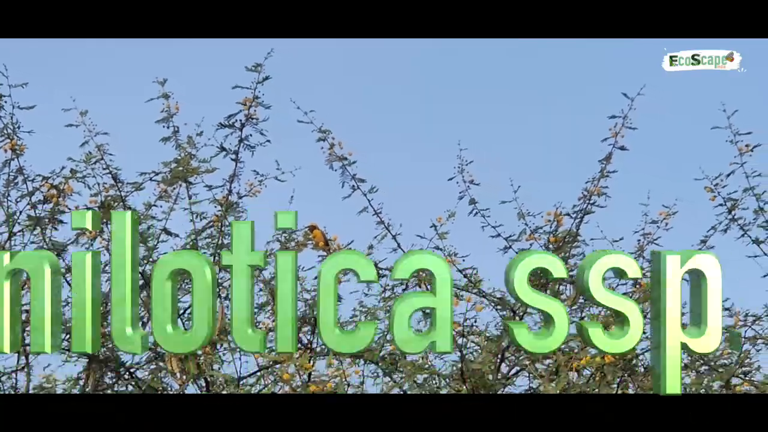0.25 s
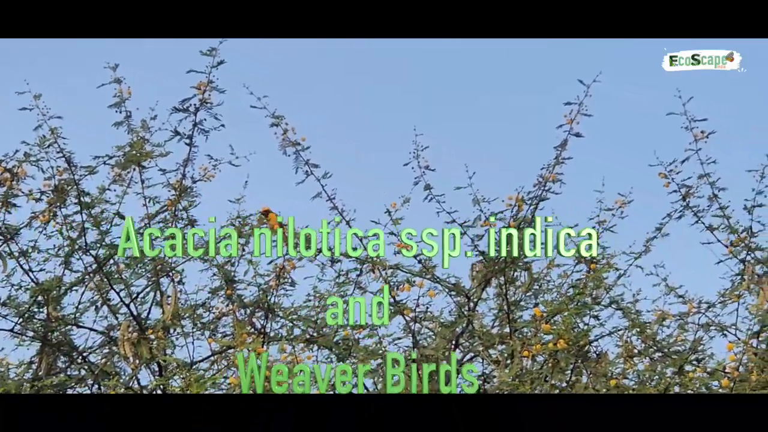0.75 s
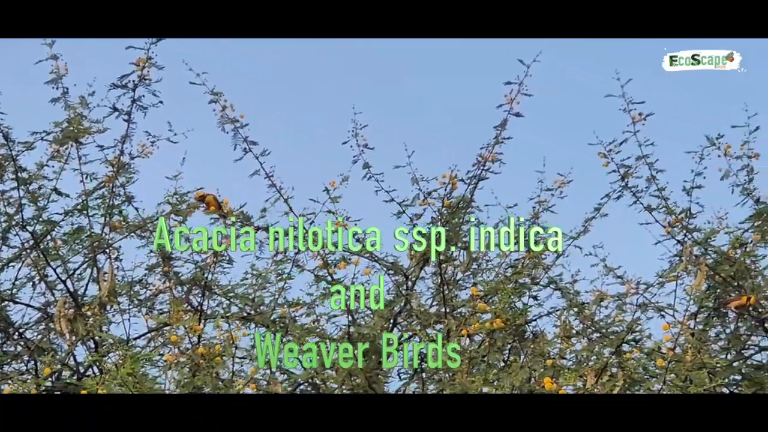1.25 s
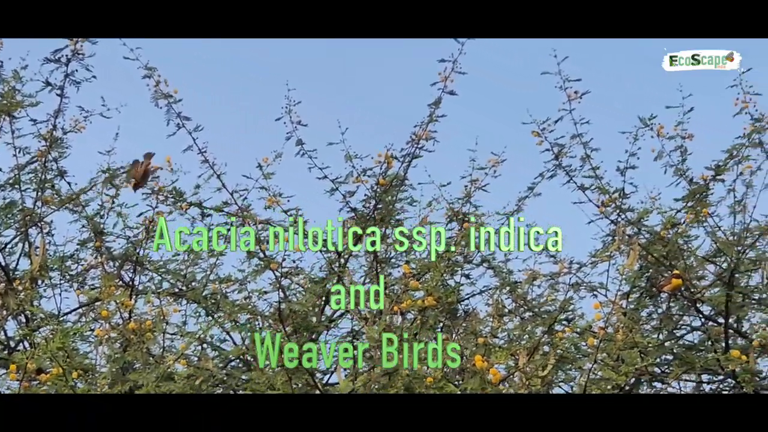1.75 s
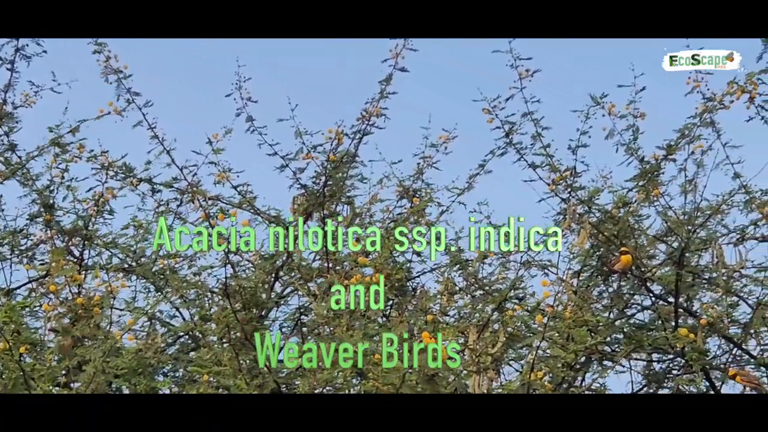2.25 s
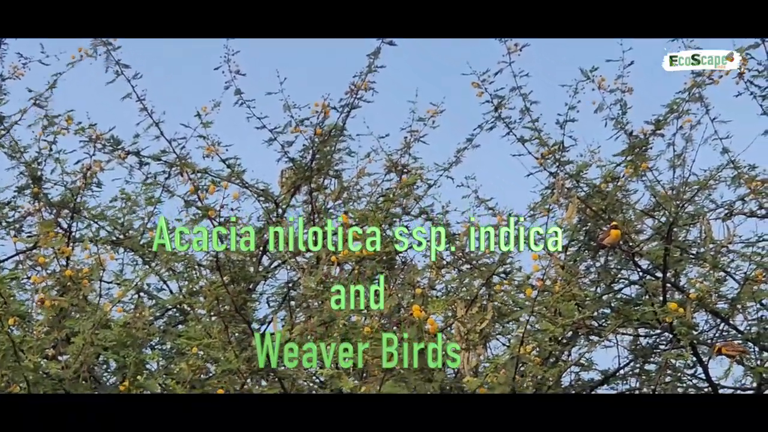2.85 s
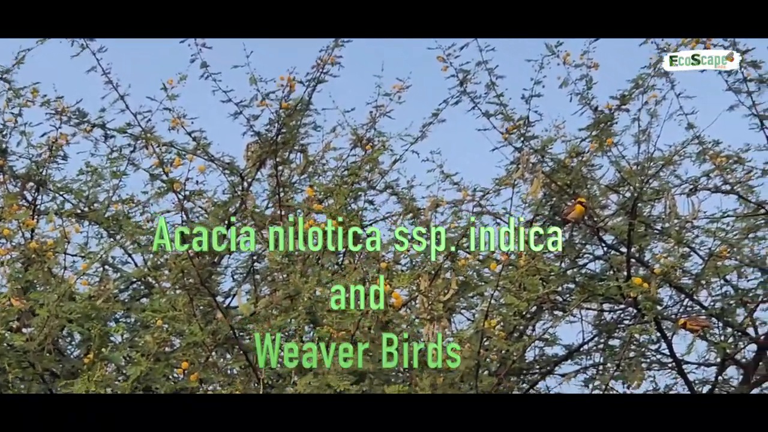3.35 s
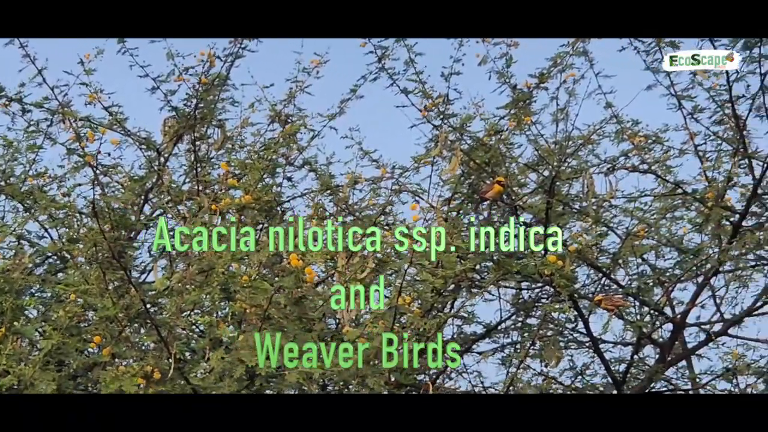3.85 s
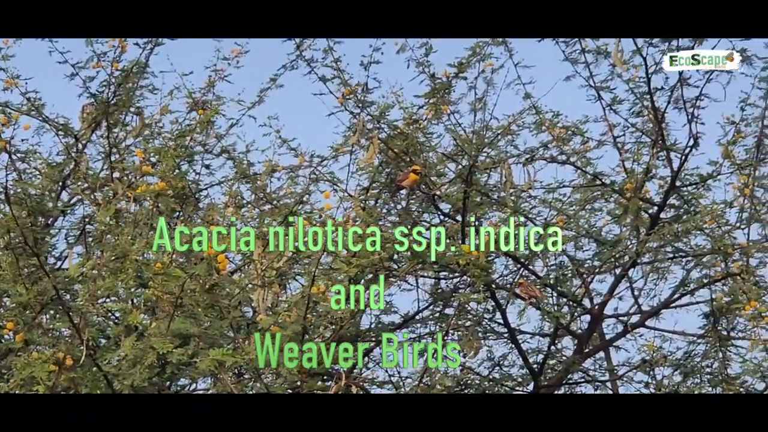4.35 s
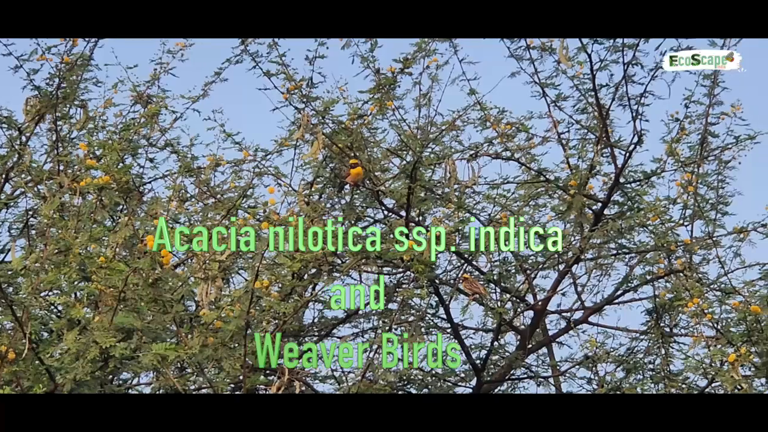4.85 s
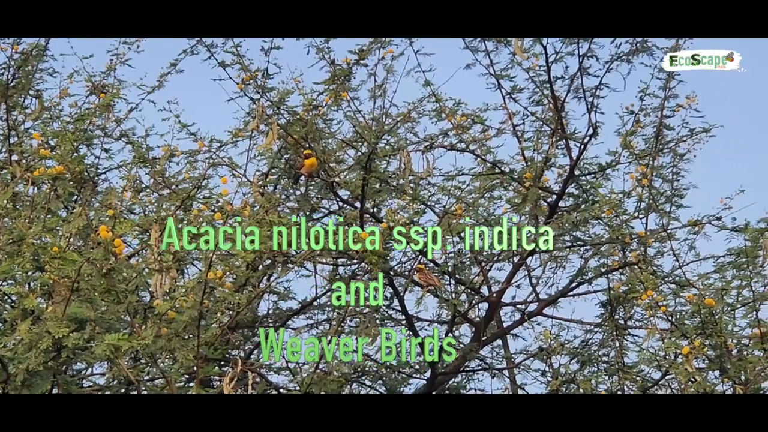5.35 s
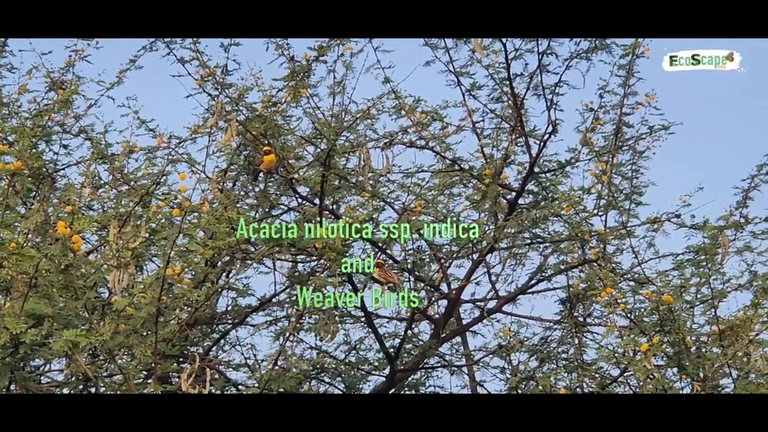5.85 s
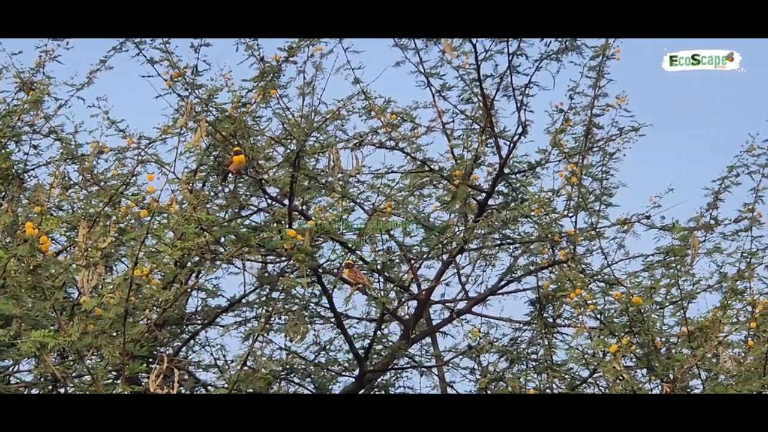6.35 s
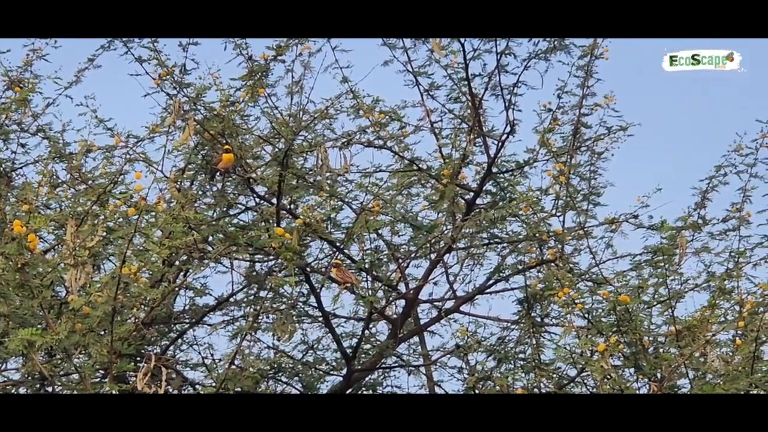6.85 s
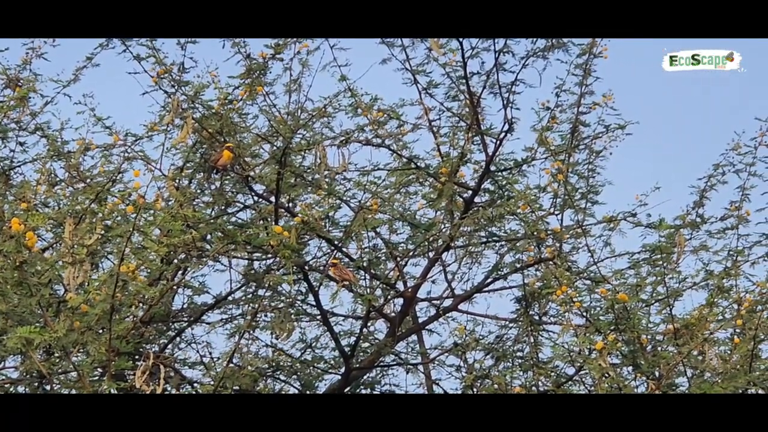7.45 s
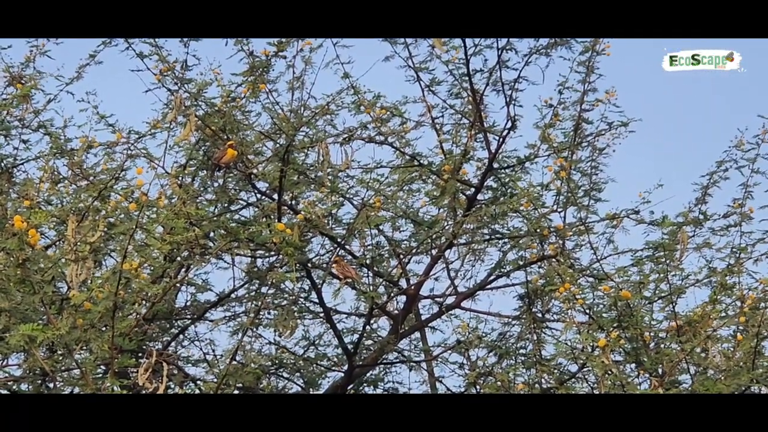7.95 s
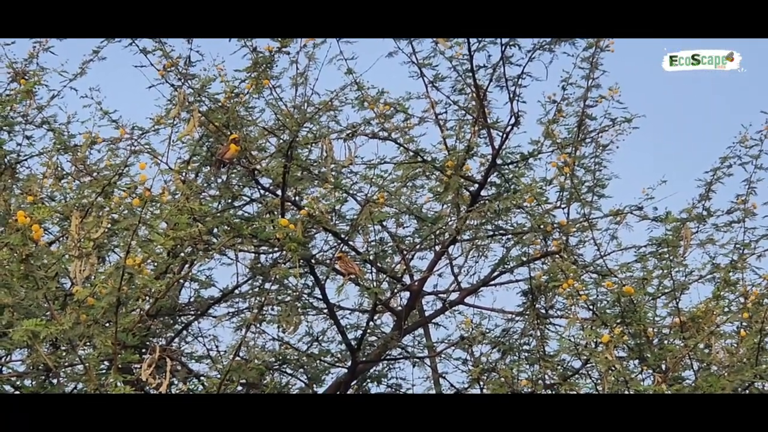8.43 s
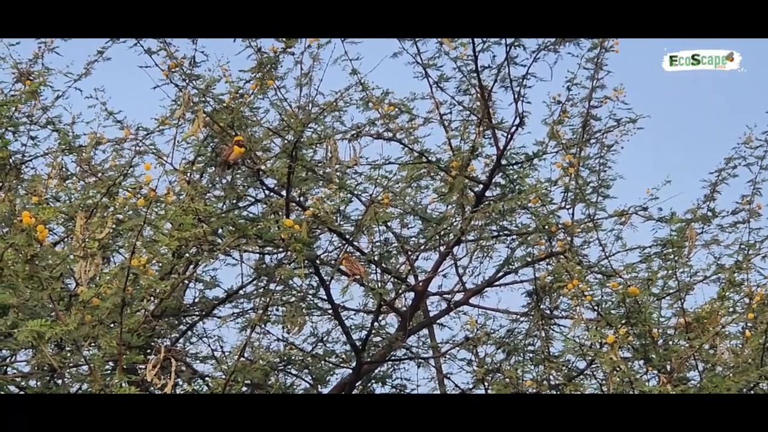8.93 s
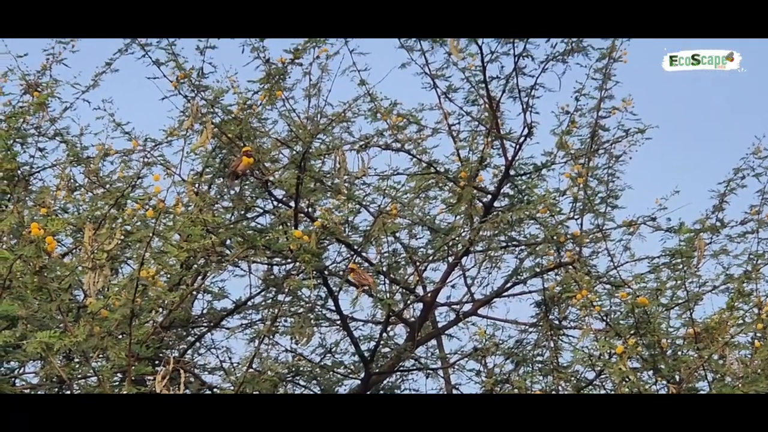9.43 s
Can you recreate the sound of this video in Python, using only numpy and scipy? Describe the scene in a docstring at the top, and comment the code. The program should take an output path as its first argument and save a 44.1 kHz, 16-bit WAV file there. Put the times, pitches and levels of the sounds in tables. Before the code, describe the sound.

Outdoors by a thorny tree, a small bird gives a half-second wheezy buzz, then sharp chips quicken into dense chatter with bright warbles. After three seconds it thins to soft whistles, a nasal whine and faint chips. Later come stuttering rattles, tumbling runs, a piercing fluttering whistle, a screech and a long wheeze. Low wind rumble, distant engine and thin insect hiss lie behind; stereo microphone with wind buffets, mostly left.

```python
"""A long wheezy buzz over a breeze's rumble comes first; then whistles, chips, warbles and stutters of weaver birds.
Near the end, tumbling runs, a long whistle and a screech lead into a second, longer wheeze in the thorn tree.
Bird voices are gliding tones with weak overtones, plus shaped noise where they are hoarse; the tree adds echoes.
Insects (sweeps and filtered noise), an engine (noisy thumps) and air and wind (noise) lie behind, in stereo.
Levels in the tables are relative: later gains shift many of them."""
import sys
import numpy as np
from scipy import signal
from scipy.fft import rfft, irfft
from scipy.io import wavfile
from scipy.ndimage import uniform_filter1d

SR = 44100
rng = np.random.default_rng(int(sys.argv[2]) if len(sys.argv) > 2 else 0)


def wav_record(signal):
    """Record a signal, one row per channel, as 16-bit PCM in the file named by sys.argv[1]."""
    frames = np.transpose(np.atleast_2d(signal))
    bounded = np.clip(frames, -1, 1)
    # unit amplitude maps onto the largest positive 16-bit level
    quanta = np.round(bounded * 32767).astype(np.int16)
    wavfile.write(sys.argv[1], SR, quanta)


N = 427329  # samples
TIME = np.arange(N) / SR


def gain_of(db):
    """Turns decibels into amplitude."""
    return 10 ** (np.asarray(db) / 20)


def evened(x):
    """Scales a sound to rms 1."""
    return x / np.sqrt(np.mean(x ** 2) + 1e-20)


def pan(db):
    """Left and right gains; a positive value makes the left louder."""
    return gain_of([[db / 2], [-db / 2]])


def noise(n=N):
    """Two independent channels of white noise."""
    return rng.standard_normal((2, n))


def read(points, hz):
    """Reads a spectrum, joining its points on a log-frequency axis."""
    f, value = np.transpose(points)
    return np.interp(np.log(hz + 1), np.log(f + 1), value)


def follow(rows, t):
    """Reads every column of a curve at the times t."""
    s, *columns = np.transpose(rows)
    return [np.interp(t, s, column) for column in columns]


def coloured(x, points):
    """Filters by a spectrum and scales to rms 1."""
    n = x.shape[-1]
    gains = gain_of(read(points, np.fft.rfftfreq(n, 1 / SR)))
    return evened(irfft(rfft(x) * gains, n))


def band(x, hz, width_hz):
    """Keeps a bell-shaped band of frequencies, like a resonance, at rms 1."""
    n = x.shape[-1]
    bell = np.exp(-.5 * ((np.fft.rfftfreq(n, 1 / SR) - hz) / width_hz) ** 2)
    return evened(irfft(rfft(x) * bell, n))


def drift(n, hz):
    """A random curve: straight lines between about hz random values a second."""
    knots = np.arange(int(n * 4000 / SR) + 2)
    return np.interp(np.arange(n) * min(hz, 3999) / SR, knots, rng.standard_normal(len(knots)))


def angle(hz):
    """The running phase of a frequency curve, in radians."""
    return 2 * np.pi * np.cumsum(hz) / SR


def add(mix, s, sound):
    """Mixes a sound in at time s."""
    part = mix[:, max(round(s * SR), 0):][:, :sound.shape[-1]]
    part += sound[..., :part.shape[1]]


def syrinx(hz, level, pan_db, lead, second_db=-30, third_db=-33):
    """A bird's voice organ: a nearly pure tone with weak overtones, lead radians early on the left."""
    phase = angle(hz) + np.array([[lead], [0]])
    second = gain_of(second_db) * np.sin(2 * phase)
    third = gain_of(third_db) * np.sin(3 * phase) * (3 * hz < SR / 2)
    return np.sqrt(2) * (np.sin(phase) + second + third) * level * pan(pan_db)


def note(length, pitches_hz, db, pan_db, depth_hz=0, trill_hz=68):
    """A whistled note that slurs through evenly spaced pitches, trilled if it has a depth."""
    u = np.linspace(0, 1, int(length * SR))
    trill = np.sin(angle(trill_hz * (1 + 0.18 * drift(len(u), 112))))
    count = len(pitches_hz)
    slur = np.polyfit(np.linspace(0, 1, count), np.log(pitches_hz), count - 1)
    hz = np.exp(np.polyval(slur, u))
    hz = hz * (1 + 0.0087 * drift(len(u), 298)) + depth_hz * trill
    level = evened(signal.windows.tukey(len(u), .3) * gain_of(-trill * depth_hz / 50))
    return syrinx(hz, gain_of(db) * level, pan_db, 1.25, second_db=-43, third_db=-52)


def stroke(top_hz, length, db, fall=.72):
    """One quick downward sweep; fall is the last pitch over the first."""
    u = np.linspace(0, 1, int(length * SR))
    level = gain_of(db - 4.0) * abs(np.sin(np.pi * u)) ** .7
    return syrinx(top_hz * fall ** u, level, 2.7, 1.81, second_db=-22, third_db=-36)


# Colour of open air: (frequency [Hz], level [dB])
AIR_COLOUR = [(150, -39), (250, 1), (452, -6), (583, -3.5), (865, -9), (1420, -5), (1950, -9),
              (2400, -11.5), (3560, -15), (4000, -11), (5200, -16.5), (8800, -120)]
# Loudness of the air over time: (time [s], level [dB])
AIR_LEVEL = [(0.0, -59), (0.13, -61.5), (1.32, -67), (6.26, -68), (9.61, -66), (9.69, -71)]


def air():
    """The soft wash of open country, a faint far drone and a thin hiss: all filtered noise."""
    db, = follow(AIR_LEVEL, TIME)
    # the shared part and its spread have opposite polarity on left and right
    wash = coloured(noise() + 0.82 * rng.standard_normal(N), AIR_COLOUR) * gain_of([[1], [-1]])
    drone = gain_of(-84.0) * band(noise(), 570, 25)
    hiss = gain_of(-81) * band(noise(), 17000, 5500)
    return gain_of(db + 10.0) * wash + drone + hiss


# Colour of wind rumble: (frequency [Hz], level [dB])
WIND_COLOUR = [(11, -44), (18, -25), (43, 3.5), (65, 2.5), (139, -7.5), (197, -18), (233, -25),
               (500, -41.5), (650, -77), (1100, -120)]
# The breeze between gusts: (time [s], level [dB], upper rumble against the deep part [dB])
BREEZE = [(0, -32.5, -21), (.3, -40, -23), (2.3, -43.5, -11), (3.9, -43.5, -19), (4.8, -43.5, -38),
          (5.8, -43.5, -6.5), (6.45, -41.5, -29), (6.8, -39.5, -9.5), (7.6, -40, -11), (8.05, -41, -33),
          (8.4, -38.5, -18), (8.85, -45.5, -20), (9.69, -40, -9.5)]
# Gusts: (peak time [s], half width [s], level [dB], upper rumble against the deep part [dB], left-right [dB])
GUSTS = [(4.215, 0.034, -31.5, -34, 6), (4.94, 0.026, -33.5, -35, 3), (7.02, 0.048, -40, -1.5, 25),
         (7.32, 0.084, -29.5, -8.5, 24), (8.717, 0.036, -29.5, -7.5, 16), (9.1, 0.078, -34, -6, 22),
         (9.37, 0.12, -32.5, -9.5, 30), (9.57, 0.035, -30.5, -11, 12)]


def wind(side_db=0.5, swell_db=4):
    """A lumpy breeze rumbles on both microphones; gusts swell over it, louder on the left, and reach higher up."""
    rumble = coloured(noise() + 1.35 * rng.standard_normal(N), WIND_COLOUR)
    deep = signal.sosfiltfilt(signal.butter(4, 130, fs=SR, output="sos"), rumble)
    # level out the deep part's own swells, so the curves alone set them
    deep_even = deep / np.sqrt(uniform_filter1d((deep ** 2).mean(0), 7000) + 1e-9)
    breeze_db, breeze_upper_db = follow(BREEZE, TIME)
    flows = [(gain_of(breeze_db + swell_db * drift(N, 8)), breeze_upper_db, side_db)]
    for s, width, db, upper_db, gust_side_db in GUSTS:
        swell = np.exp(-.5 * ((TIME - s) / width) ** 2)
        flows.append((gain_of(db) * swell, upper_db, gust_side_db))
    deep_power = upper_power = 0
    for level, upper_db, flow_side_db in flows:
        power = (level * evened(pan(flow_side_db))) ** 2
        deep_power = deep_power + power
        upper_power = upper_power + power * gain_of(2 * upper_db)
    return np.sqrt(deep_power) * deep_even + np.sqrt(upper_power) * evened(rumble - deep)


# The far engine: (time [s], firings per second [Hz], level [dB])
ENGINE = [(0, 27.7, -48), (1.7, 23.1, -51.5), (2.2, 26, -43.5), (2.7, 24.8, -44), (3.3, 26.5, -48.5),
          (3.7, 28.3, -55.5), (9.7, 32.4, -54)]


def engine():
    """Each firing thumps a short exhaust pipe: a noisy burst that dies away within the cycle."""
    rate, db = follow(ENGINE, TIME)
    cycle = angle(rate) / (2 * np.pi) % 1
    thumps = np.exp(-cycle / 0.044) * (1 + 3 * rng.standard_normal(N))
    pipe = [(30, -35), (80, -10.0), (130, -1.0), (200, -3),
            (280, -29.0), (600, -36.0), (1500, -51), (4000, -100)]  # (Hz, dB)
    return gain_of(db) * coloured(thumps, pipe) * pan(5)


# Colour of the shrillest insect: (frequency [Hz], level [dB])
INSECT_COLOUR = [(5900, -26), (6300, -1.5), (7000, -4.5), (7600, 2), (8500, 2), (9100, -3), (9500, -92)]


def insects(hiss=3.2):
    """One insect rattles in fast falling sweeps under hiss; lower down, one throbs and another flickers."""
    cycle = angle(118 * (1 + .11 * drift(N, 120))) / (2 * np.pi) % 1
    sweep_hz = 9200 - 2900 * cycle + 160 * drift(N, 400)
    sweep_level = np.sin(np.pi * cycle) * gain_of(2.0 * drift(N, 150))
    sweeps = syrinx(sweep_hz, sweep_level, 0.33, 1.52, second_db=-85, third_db=-60)
    shrill = gain_of(-52.5) * coloured(evened(sweeps) + hiss * noise(), INSECT_COLOUR)
    throb = gain_of(3.5 * np.sin(angle(27 + 2 * drift(N, 8))) + 2.5 * drift(N, 5))
    low = gain_of(-55.5) * evened(throb * band(noise(), 4698, 175))
    flicker = gain_of(1.8 * drift(N, 70))
    high = gain_of(-56.5) * evened(flicker * band(noise(), 5254, 235))
    return shrill + low + high


def colony(count=170):
    """Many more birds farther off, each giving a short falling note."""
    out = np.zeros((2, N))
    for when, pitch, long, loud, side in rng.random((count, 5)):
        u = np.linspace(0, 1, int((0.0255 + 0.0497 * long) * SR))
        level = gain_of(-76 + 6 * (loud - .5)) * np.sin(np.pi * u)
        hz = (1900 + 1600 * pitch) * (1 - 0.076 * u ** 2)
        call = syrinx(hz, level, 8 * (side - .5), 2 * np.pi * side, second_db=-48, third_db=-53)
        add(out, when * N / SR, call)
    return out


# Hoarse calls from far away: (time [s], length [s], centre [Hz], level [dB])
FAR_CALLS = [(3.714, 0.25, 1930, -70.5), (6.209, 0.55, 1380, -84), (8.321, .3, 1510, -66),
             (8.868, .32, 1480, -67), (9.392, 0.31, 1480, -68)]


def far_calls():
    """Distant hoarse birds: rough, slowing pulses of noise in one throat resonance."""
    out = np.zeros((2, N))
    for s, length, hz, db in FAR_CALLS:
        n = int(length * SR)
        pulses = gain_of(0.88 * np.sin(angle(np.linspace(115, 95, n)))) * noise(n)
        add(out, s, gain_of(db) * band(pulses, hz, 215) * signal.windows.tukey(n, .6))
    return out


# A far bird's nasal whine: (time [s], pitch [Hz], level [dB], stammer depth [dB])
WHINE = [(3.17, 296, -66, 14), (3.205, 297, -49, 14), (3.29, 306, -44, 12), (3.4, 301, -49, 7),
         (3.5, 296, -50, 5), (3.6, 290, -60, 1), (3.72, 276, -65, 2)]
# Its throat: (frequency [Hz], level [dB])
WHINE_THROAT = [(1500, -16), (1850, 0), (2650, -8), (2980, 5), (3270, -17), (3580, 12), (3850, -6),
                (4150, -22), (4800, -35)]


def whine(stammer_hz=28.5, dip=.035):
    """A buzzing stack of overtones through a narrow throat; the pitch dips in each pulse of the stammer."""
    t = np.arange(WHINE[0][0], WHINE[-1][0], 1 / SR)
    hz, db, stammer = follow(WHINE, t)
    pulse = np.cos(angle(stammer_hz + drift(len(t), 24)))
    shake = .0015 * (1 + abs(stammer)) * drift(len(t), 401)
    bend = dip * np.clip(stammer / 4, 0, 1) * (.6 - pulse)
    phase = angle(hz * (1 + shake + bend))
    overtones = sum(np.cos(k * phase + np.array([[k / 10], [0]])) for k in range(5, 16))
    out = np.zeros((2, N))
    add(out, t[0], coloured(overtones, WHINE_THROAT) * gain_of(db + stammer * (pulse - 1.5)))
    return out


# Soft coos from far away: (time [s], length [s], pitch [Hz], level [dB])
COOS = [(5.052, 0.11, 572, -54.5), (7.441, 0.11, 615, -51.5), (9.228, 0.197, 609, -60.5)]


def coos(end=0.93):
    """Low, nearly level notes that sink a little at the end."""
    out = np.zeros((2, N))
    for s, length, hz, db in COOS:
        add(out, s, note(length, [hz, hz, end * hz], db, pan_db=7))
    return out


# Short drooping pips: (time [s], pitch [Hz], level [dB])
PIPS = [(.02, 3250, -61), (.128, 3330, -61), (.232, 3200, -52), (1.265, 2240, -52.5), (2.055, 1960, -53),
        (3.34, 2090, -44.5), (4.342, 1990, -50), (4.745, 2174, -47.5), (5.563, 1960, -48.5),
        (8.712, 2247, -35.5), (8.866, 2980, -38.5), (8.95, 2285, -46)]


def pips(length_s=0.04, start=0.93, end=0.902):
    """Short notes that rise slightly and then droop."""
    out = np.zeros((2, N))
    for s, hz, db in PIPS:
        add(out, s, note(length_s, [start * hz, hz, end * hz], db, pan_db=3.5))
    return out


# Arched whistles: (time [s], length [s], top [Hz], last pitch [Hz], level [dB], buzz depth [Hz])
ARCHES = [(3.711, 0.088, 4400, 3500, -48, 260), (4.314, 0.1, 3600, 3300, -50, 60),
          (5.723, .125, 3610, 3000, -47.5, 70)]


def arches(start=.91, shoulder=.95):
    """Buzzing whistles that rise quickly and sink slowly."""
    out = np.zeros((2, N))
    for s, length, hz, last, db, depth_hz in ARCHES:
        pitches_hz = [start * hz, hz, shoulder * hz, last]
        add(out, s, note(length, pitches_hz, db, 1.7, depth_hz, trill_hz=147.6))
    return out


# Low trills: (time [s], length [s], pitch [Hz], level [dB], left-right [dB])
TRILLS = [(0.335, 0.04, 2150, -40.5, 1), (1.616, 0.016, 2200, -44.5, 1), (1.64, 0.051, 2380, -44.5, -3),
          (2.891, .06, 2670, -53.5, -14), (3.007, 0.06, 2380, -42, -2), (4.666, 0.099, 2380, -45.5, -2),
          (6.58, 0.08, 2490, -44.5, -2), (8.415, 0.098, 2330, -44.5, 10), (8.612, 0.084, 2540, -46.5, 12),
          (8.861, 0.034, 2100, -43, 3), (9.034, 0.071, 3183, -39, 0)]


def trills(ends=.92, depth_hz=215, trill_hz=85):
    """Rolling notes that bow gently up and down."""
    out = np.zeros((2, N))
    for s, length, hz, db, pan_db in TRILLS:
        add(out, s, note(length, [ends * hz, hz, ends * hz], db, pan_db, depth_hz, trill_hz))
    return out


# Sliding whistles: (time [s], length [s], first pitch [Hz], last pitch [Hz], level [dB])
SLIDES = [(0.302, 0.048, 3990, 4070, -35), (0.363, 0.04, 4040, 4160, -31.5),
          (0.444, 0.0162, 4430, 3500, -33), (0.453, 0.022, 3520, 3090, -35),
          (0.479, 0.042, 2370, 2006, -45.5), (0.554, 0.013, 3100, 3080, -45.5),
          (0.605, 0.071, 4300, 4270, -51), (0.767, 0.031, 4800, 4560, -58), (1.2, 0.08, 2420, 2970, -63),
          (1.886, 0.072, 3600, 3800, -42), (4.7, 0.028, 3050, 3320, -45), (4.74, 0.027, 3760, 3250, -46),
          (4.764, 0.028, 3180, 3050, -39.5), (5.692, 0.044, 2970, 2880, -53),
          (5.861, .023, 3280, 2570, -52.5), (6.33, 0.16, 1470, 1390, -60.5), (6.43, 0.05, 3800, 3300, -59),
          (6.628, 0.04, 3750, 2950, -48.5), (6.69, 0.026, 4000, 3000, -50), (6.791, .048, 4130, 2810, -53),
          (7.353, 0.085, 1690, 1540, -52), (8.68, 0.011, 3000, 2830, -39), (8.827, 0.13, 4390, 3630, -26.5),
          (8.96, 0.069, 3630, 3200, -34.5), (9.426, 0.052, 5050, 4500, -30)]


def slides():
    """Whistles that glide evenly from one pitch to another."""
    out = np.zeros((2, N))
    for s, length, first, last, db in SLIDES:
        add(out, s, note(length, [first, last], db, pan_db=2.5))
    return out


# A phrase that slides down in two steps: (delay [s], length [s], first pitch [Hz], middle pitch [Hz],
# last pitch [Hz], trill depth [Hz], level [dB], left-right [dB])
STEP_PHRASE = [(0, .076, 3950, 2770, 2600, 0, 1.5, 5), (.085, 0.028, 2680, 2260, 1760, 0, 3.5, 10.5)]
# Its repeats: (time [s], level [dB])
STEP_SONG = [(5.9, -56.5), (6.148, -55.5), (6.385, -55), (6.622, -54.5), (6.859, -54.5)]
# A phrase that trills upwards, peaks, and drops to a low held note: columns as in STEP_PHRASE
TRILL_PHRASE = [(0, 0.11, 2840, 3150, 3060, 199, -1, 2.5), (.097, 0.039, 3660, 3860, 3930, 0, 2, -1),
                (.137, .022, 3200, 2740, 2400, 0, 2.5, 7), (.152, 0.068, 2345, 2230, 2170, 8, 0.5, 12.5)]
# Its repeats: (time [s], level [dB])
TRILL_SONG = [(1.797, -50.5), (7.008, -47), (7.997, -45.5)]


def song(phrase, repeats):
    """A bird repeats one phrase of slurred notes, louder or softer."""
    out = np.zeros((2, N))
    for s, db in repeats:
        for delay, length, first, middle, last, depth, note_db, pan_db in phrase:
            add(out, s + delay, note(length, [first, middle, last], db + note_db, pan_db, depth))
    return out


# One long, near whistle: (time [s], pitch [Hz], level [dB])
LONG_WHISTLE = [(8.091, 3930, -40), (8.123, 3840, -19.5), (8.159, 3840, -20), (8.189, 3955, -30),
                (8.325, 4030, -28.5), (8.348, 3820, -21.5), (8.37, 3650, -21), (8.41, 3270, -30.5),
                (8.506, 2830, -38)]


def long_whistle(trill_hz=125, depth_hz=75, from_s=8.16, to_s=8.347, fade_s=0.024):
    """A held note that flutters strongly between from_s and to_s and then falls."""
    t = np.arange(LONG_WHISTLE[0][0], LONG_WHISTLE[-1][0], 1 / SR)
    hz, db = follow(LONG_WHISTLE, t)
    depth = depth_hz * np.clip(np.minimum(t - from_s, to_s - t) / fade_s, .08, 1)
    flutter = angle(trill_hz * (1 + 0.1 * drift(len(t), 110)))
    level = gain_of(db + depth / 45 * np.cos(flutter)) * signal.windows.tukey(len(t), .03)
    pitch = hz + depth * np.sin(flutter) + 12 * drift(len(t), 404.6)
    out = np.zeros((2, N))
    add(out, t[0], syrinx(pitch, level, 2.6, 1.22, second_db=-35, third_db=-44))
    return out


def add_flurry(mix, s, length, low_hz, high_hz, db, count):
    """Adds faint stray sweeps, scattered in time and pitch around a call."""
    for when, pitch, long, loud in rng.random((count, 4)):
        top_hz = low_hz + pitch * (high_hz - low_hz)
        add(mix, s + when * length, stroke(top_hz, .005 + .005 * long, db - 6 * loud, fall=.76))


# Colour of the rasp's noise: (frequency [Hz], level [dB])
RASP_COLOUR = [(1500, -3.5), (2300, 5.5), (3500, -10), (5200, 24.5), (6800, 13.5), (9000, 14), (12500, -42),
               (16000, 11)]


def rasp(length, rise=0.14, top_hz=6500, end_hz=4400, hiss=.6):
    """A harsh burst: the membranes flap irregularly around a falling pitch; hiss is the noise share."""
    u = np.linspace(0, 1, int(length * SR))
    flaps = gain_of(0.61 * drift(len(u), 493))
    hz = top_hz + (end_hz - top_hz) * u + 650 * drift(len(u), 900)
    tone = syrinx(hz, flaps, 0.54, 0.8, second_db=-30, third_db=-21.0)
    breath = coloured(flaps * noise(len(u)), RASP_COLOUR)
    return evened((1 - hiss) * evened(tone) + hiss * breath) * np.interp(u, [0, rise, 1], [0, 1.4, 0])


# Tumbling runs: (time [s], first sweep's top [Hz], last sweep's top [Hz], level [dB], rasp level [dB])
RUNS = [(7.713, 6070, 4194, -25, -36.5), (7.806, 6100, 4400, -24, -34.5), (7.897, 6260, 4215, -24.5, -34.5)]


def runs(count=8, sweeps_per_s=104, scatter=.04, loose_s=.0012, rough_db=2):
    """Steep sweeps tumble down in pitch among stray ones, swelling out of a hoarse start."""
    out = np.zeros((2, N))
    for s, first, last, db, rasp_db in RUNS:
        for k, (late, sharp, loud) in enumerate(rng.standard_normal((count, 3))):
            u = k / (count - 1)
            swell = np.interp(u, [0, .45, .85, 1], [-7, -1, 1, -4])
            hz = first * (last / first) ** u * (1 + scatter * sharp)
            sweep = stroke(hz, .0095, db + swell + rough_db * loud, fall=.77)
            add(out, s + k / sweeps_per_s + loose_s * late, sweep)
        add_flurry(out, s, .08, 3900, 6000, db - 5, count=17)
        hoarse_start = rasp(0.11, rise=0.18, top_hz=6270, end_hz=4760, hiss=0.83)
        add(out, s - .006, gain_of(rasp_db) * hoarse_start)
    return out


# Stuttered calls: (time [s], first stroke's top [Hz], last stroke's top [Hz], level [dB],
# second side's level [dB])
STUTTERS = [(7.209, 5000, 4220, -33, -41), (7.348, 4870, 4450, -31.5, -35), (7.482, 5190, 4450, -31.5, -35),
            (7.632, 5110, 4510, -28, -35.5)]
# The strokes of every stutter: (delay [s], length [s], pitch ratio, level [dB])
STROKES = [(0, .009, 1, -2), (.0215, .007, 1.08, 0), (.040, .009, 1, 0), (.048, .014, 1, -.5),
           (.060, .012, .98, -9)]


def stutters(scatter=.012, loose_s=.0005, rough_db=1):
    """A tight rattle of steep strokes that sinks in pitch; the syrinx's second side slurs below the first three."""
    out = np.zeros((2, N))
    for s, first, last, db, second_db in STUTTERS:
        tops_hz = np.geomspace(first, last, len(STROKES))
        chance = rng.standard_normal((len(STROKES), 3))
        for (delay, length, ratio, stroke_db), top_hz, (late, sharp, loud) in zip(STROKES, tops_hz, chance):
            hz = top_hz * ratio * (1 + scatter * sharp)
            beat = stroke(hz, length, db + stroke_db + rough_db * loud, fall=.7)
            add(out, s + delay + loose_s * late, beat)
        for delay, _, _, stroke_db in STROKES[:3]:
            add(out, s + delay - .007, stroke(3850, 0.011, second_db + stroke_db, fall=0.837))
        add_flurry(out, s, .07, 4400, 5900, db - 8, count=14)
        add_flurry(out, s + .015, .055, 2700, 4200, db - 11, count=9)
    return out


# Warbles: (first crest's time [s], last crest's time [s], first crest [Hz], last crest [Hz], trough [Hz],
# level [dB], level of the rasp at the start [dB])
WARBLES = [(2.093, 2.16, 4660, 4520, 3097, -28.5, -45), (2.311, 2.354, 5330, 5090, 3250, -27, -43),
           (2.533, 2.602, 4824, 4380, 3156, -29, -50), (2.76, 2.818, 4580, 4810, 3114, -30.5, -52),
           (2.967, 3.03, 4900, 4590, 3035, -34.5, -38.5)]


def warbles(crests_per_s=46):
    """The pitch swings in round troughs between sharp crests, with a rasping start."""
    out = np.zeros((2, N))
    for s, end, first, last, bottom, db, rasp_db in WARBLES:
        count = round((end - s) * crests_per_s)
        period = (end - s) / count
        t = np.arange(s - period / 2, end + 0.59 * period, 1 / SR)
        height = 1 - abs(np.sin(np.pi * (t - s) / period)) ** 0.84
        hz = bottom + (np.interp(t, [s, end], [first, last]) - bottom) * height
        hz = hz + 40 * drift(len(t), 840) + 65 * drift(len(t), 80)
        swell = np.interp(t, [t[0], s + period, end, t[-1]], [0.5, 0.5, 4.0, -1])
        swell = swell + 5 * height + 0.93 * drift(len(t), 95)
        level = gain_of(db - 11.0 + swell) * signal.windows.tukey(len(t), .1)
        add(out, t[0], syrinx(hz, level, 1, -1.37, second_db=-35, third_db=-40))
        # the syrinx's second side flicks down after each crest
        for crest in np.linspace(s, end, count + 1):
            late = .005 + .001 * rng.standard_normal()
            add(out, crest + late, stroke(last * rng.uniform(.95, 1.05), .008, db - 11, fall=.76))
        add_flurry(out, s, end - s + .03, 3700, 1.1 * last, db - 7, count=13)
        rough_start = rasp(0.12, rise=0.046, top_hz=6340, end_hz=4260, hiss=0.94)
        add(out, s - .018, gain_of(rasp_db) * rough_start)
    return out


# Colour of a chip's dry edge: (frequency [Hz], level [dB])
CHIP_EDGE = [(1700, -31), (2600, -8), (3600, -1), (5200, 3.5), (6500, -2.5), (9000, -6), (10500, -23.5),
             (15000, -18)]


def scuff(rise_s=.012, t60=.115, low_db=-6, low_peak_s=.03, low_hz=2900):
    """The dry edge of a chip: a wide, grainy puff of noise whose low part comes later."""
    t = np.arange(0, .08, 1 / SR)
    grain = gain_of(3.5 * drift(len(t), 450)) * noise(len(t))
    fade = np.minimum(t / rise_s, 1) * gain_of(-60 * np.maximum(t - rise_s, 0) / t60)
    low_swell = np.interp(t, [0, low_peak_s, t[-1]], [0, 1, 0]) ** 2
    return coloured(grain, CHIP_EDGE) * fade + gain_of(low_db) * band(grain, low_hz, 910) * low_swell


# Sharp falling chips, some clear and some only a dry scuff: (time [s], top pitch [Hz], level [dB],
# scuff level [dB])
CHIPS = [(0.718, 4580, -28.5, -46.5), (0.749, 5260, -39, -68), (0.828, 4160, -31.5, -58),
         (.985, 4650, -23.5, -43.5), (1.092, 4640, -24.5, -44), (1.278, 5060, -29, -46),
         (1.416, 5050, -28.5, -44), (1.556, 5100, -35, -41.5), (1.663, 4890, -29, -40),
         (1.763, 4930, -28, -44), (1.866, 4680, -24, -40.5), (1.892, 6150, -30, -43),
         (1.924, 4030, -26, -45), (1.956, 4550, -23, -44.5), (1.972, 4630, -25, -43),
         (2.057, 4620, -28, -41), (2.073, 4530, -24, -49), (2.089, 6150, -29, -59), (2.188, 3900, -30, -55),
         (2.263, 4570, -23, -43), (2.277, 6700, -27.5, -39.5), (2.286, 5700, -25, -50),
         (2.366, 5020, -22, -44), (2.389, 3970, -33, -51), (2.456, 4430, -28, -45.5),
         (2.466, 4520, -26.5, -43.5), (2.506, 3820, -34, -45), (2.519, 4260, -29, -45),
         (2.524, 6450, -32, -54), (2.586, 4020, -30.5, -48), (2.729, 3940, -32, -62),
         (2.741, 3950, -44, -67), (2.937, 4430, -29, -39), (2.954, 6200, -26, -56),
         (4.625, 5900, -37, -44.5), (4.728, 4625, -34, -41.5), (4.804, 6130, -37, -44),
         (4.914, 5580, -37, -42), (5.032, 5740, -37, -46), (5.15, 4500, -46, -44), (5.298, 4800, -39, -46)]
# The flicks around every chip: (delay [s], pitch ratio, length [s], level [dB])
FLICKS = [(-.006, .86, .007, -12), (.008, 1.06, .008, -14), (.014, .9, .01, -13), (.023, .8, .016, -16)]


def chips(fall=.72, loose_s=.0012, scatter=0.035):
    """Each chip is a thin sweep with a dry edge, among weaker flicks that vary from chip to chip."""
    out = np.zeros((2, N))
    for s, hz, db, scuff_db in CHIPS:
        add(out, s - .001, stroke(hz * 1.03, 0.0085, db - 4.5, fall=fall))
        chance = rng.standard_normal((len(FLICKS), 2))
        for (delay, ratio, length, flick_db), (late, sharp) in zip(FLICKS, chance):
            flick = stroke(hz * ratio * (1 + scatter * sharp), length, db + flick_db, fall=0.86)
            add(out, s + delay + loose_s * late, flick)
        add(out, s - .009, gain_of(scuff_db) * scuff())
    return out


# The hoarse screech: (time [s], level [dB])
SCREECH = [(8.14, -51), (8.19, -39.5), (8.29, -35.5), (8.38, -36.5), (8.46, -36.5), (8.51, -37.5),
           (8.555, -32.5), (8.6, -43), (8.66, -38)]
# Its colour: (frequency [Hz], level [dB])
SCREECH_COLOUR = [(1200, -56), (2400, -21), (3400, -15), (4300, -2), (5400, 0.5), (6800, -13), (7900, -11),
                  (10000, -20.5), (11800, -14.5), (13000, -31), (15000, -14), (16000, -32)]


def screech():
    """A broad band of noise, rattled in level, that leads into the second wheeze."""
    db, = follow(SCREECH, TIME)
    rattle = gain_of(1.3 * np.sin(angle(125 + 20 * drift(N, 80))))
    sounding = (TIME > SCREECH[0][0]) & (TIME < SCREECH[-1][0])
    return gain_of(db) * sounding * coloured(rattle * noise(), SCREECH_COLOUR)


def churr(n, rate_hz=68, bottom_hz=3330, swing_hz=1300, count=2):
    """Neighbours join in with quick, uneven warbles under the wheeze."""
    out = np.zeros((2, n))
    for lead in np.linspace(.8, 2, count):
        height = 1 - abs(np.sin(angle(rate_hz * (1 + .2 * drift(n, 40))) / 2))
        hz = bottom_hz + swing_hz * height + 130 * drift(n, 45)
        out += syrinx(hz, gain_of(9 * np.sqrt(height) + 4 * drift(n, 40)), 1, lead)
    return evened(out)


# Two wheezes, each a list of: (time [s], level [dB], buzz rate [Hz], churr share [0-1],
# lower side's pitch [Hz], upper side's pitch [Hz])
WHEEZES = [
    [(0, -33.5, 244.6, 0.17, 4310, 5660), (.2, -33, 243.6, 0.1, 4318, 5620),
     (.31, -33.5, 247.3, 0.03, 4320, 5690), (.43, -34, 247, 0.3, 4390, 5650),
     (.452, -40, 250, .1, 4400, 5500), (.47, -56, 250, .1, 4300, 5400)],
    [(8.58, -42, 239.7, .1, 4340, 5560), (8.64, -31.5, 240.2, 0, 4307, 5710),
     (8.98, -31, 240, 0.29, 4282, 5594), (9.12, -31, 238.6, 0.45, 4302, 5750),
     (9.2, -30, 236.6, 0, 4316, 5690), (9.27, -29.5, 241.7, 0.45, 4320, 5660),
     (9.5, -29.5, 241, 0.26, 4330, 5610), (9.7, -31, 240.5, 0.7, 4276, 5520)],
]
# Colour of their hiss: (frequency [Hz], level [dB])
WHEEZE_COLOUR = [(1000, -33), (1710, -20), (2180, -15), (2810, 3), (3930, -8), (5130, -3.5), (5570, 3),
                 (6300, 6), (6860, -18), (7790, 0.5), (9720, -17.5), (13000, -5.5), (16000, -15)]


def wheezes(upper_buzz_hz=158, jitter=.06, wander_hz=52, sway_hz=32, hoarse=.25, grain_db=3.6):
    """Both sides of the syrinx sing, each swung in pitch by its own fast buzz; they sway and sputter in a hiss."""
    out = np.zeros((2, N))
    throat = signal.butter(6, 3550, "highpass", fs=SR, output="sos")
    for rows in WHEEZES:
        t = np.arange(rows[0][0], rows[-1][0], 1 / SR)
        db, rate, churr_share, lower_hz, upper_hz = follow(rows, t)
        n = len(t)
        buzz = angle(rate * (1 + jitter * drift(n, 300)))
        upper_buzz = angle(upper_buzz_hz * (1 + .12 * drift(n, 200)))
        stray = [wander_hz * drift(n, 700) + sway_hz * drift(n, 21.93) for side in range(2)]
        sputter = [gain_of(grain_db * drift(n, 200)) for side in range(2)]
        lower_pitch = lower_hz + 230 * np.sin(buzz) + 510 * np.sin(2 * buzz) + stray[0]
        lower = syrinx(lower_pitch, sputter[0], 1, 1.1, second_db=-24, third_db=-15)
        upper_pitch = upper_hz + 230 * np.sin(upper_buzz) + 110 * drift(n, 1400) + stray[1]
        upper_level = sputter[1] * gain_of(3 * np.cos(upper_buzz))
        upper = syrinx(upper_pitch, upper_level, 1, 2.13, second_db=-18, third_db=-50)
        hiss = coloured(noise(n) * (1 + .8 * np.cos(buzz)), WHEEZE_COLOUR)
        voice = signal.sosfilt(throat, (1 - hoarse) * evened(lower + upper) + hoarse * hiss)
        # about an octave below the lower side
        undertone = gain_of(-29.5) * band(noise(n), 2030, 86)
        neighbours = np.clip(churr_share, 0, 1) * churr(n)
        add(out, t[0], gain_of(db) * evened(voice + undertone + neighbours))
    return out


# How long echoes ring: (frequency [Hz], time to fall by 60 dB [s])
TREE = [(300, 0.11), (2000, 0.4), (4500, 0.2), (9000, 0.32), (16000, 0.056)]


def tree(x, twigs_db, far_db, twigs_t60):
    """Twigs scatter the calls at once; the country around adds a faint tail."""
    taps = noise(SR // 2) * (rng.random((2, SR // 2)) < .05)
    t = np.arange(SR // 2) / SR
    twigs = taps * gain_of(-60 * t / twigs_t60) * (t > .001)
    hz, at, z = signal.stft(taps * (t > .015), SR, nperseg=256)
    fade = gain_of(-60 * at / read(TREE, hz)[:, None])
    tail = signal.istft(z * fade, SR, nperseg=256)[1][:, :len(t)]
    echo = (gain_of(twigs_db) * evened(twigs) + gain_of(far_db) * evened(tail)) / np.sqrt(len(t))
    return x + signal.fftconvolve(x, echo, axes=1)[:, :N]


def scene():
    """The birds in their tree, over insects, air, wind and engine."""
    background = air() + wind() + engine() + insects()
    far = tree(far_calls() + colony(), twigs_db=13.5, far_db=9.0, twigs_t60=0.025)
    songs = song(STEP_PHRASE, STEP_SONG) + song(TRILL_PHRASE, TRILL_SONG)
    whistles = songs + trills() + arches() + slides() + pips() + coos() + whine()
    notes = tree(gain_of(-3) * whistles, twigs_db=-10, far_db=-14, twigs_t60=.06)
    near = tree(long_whistle(), twigs_db=-14, far_db=-24, twigs_t60=.05)
    chatter = chips() + warbles() + stutters() + runs()
    close = tree(chatter, twigs_db=-9.5, far_db=-16, twigs_t60=.14)
    buzzes = tree(gain_of(2) * (wheezes() + screech()), twigs_db=-6, far_db=-17, twigs_t60=.05)
    return background + far + notes + near + close + buzzes


def record(dry, edge_hz=15900):
    """The recorder's band limit: a steep filter takes away the treble above edge_hz."""
    lowpass = signal.firwin(511, edge_hz, window=("kaiser", 9), fs=SR)
    return signal.oaconvolve(dry, lowpass[None], "same", axes=1)


dry = scene()
out = record(dry)
wav_record(out)
```